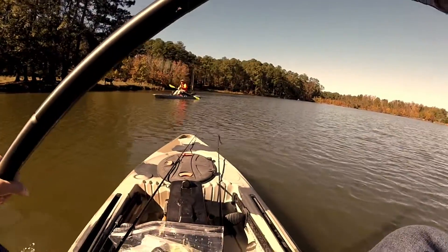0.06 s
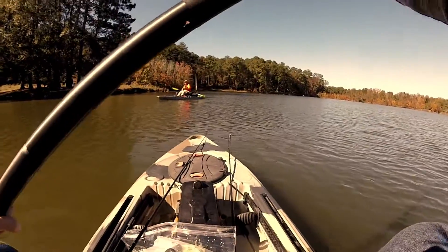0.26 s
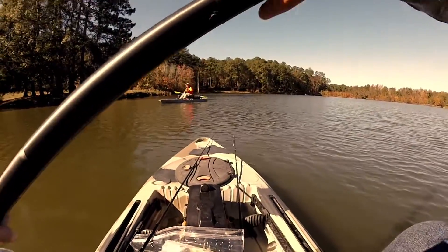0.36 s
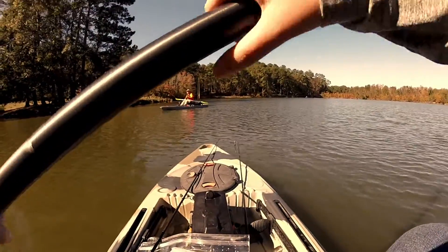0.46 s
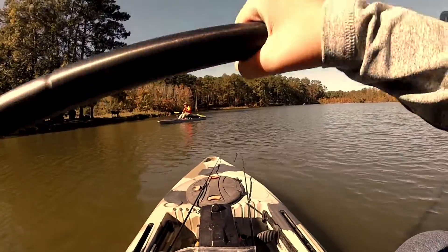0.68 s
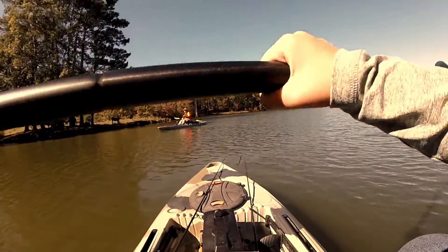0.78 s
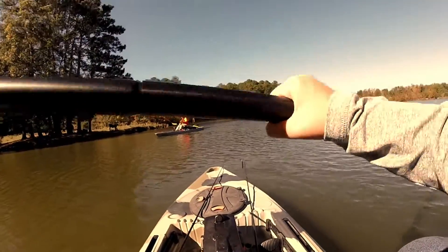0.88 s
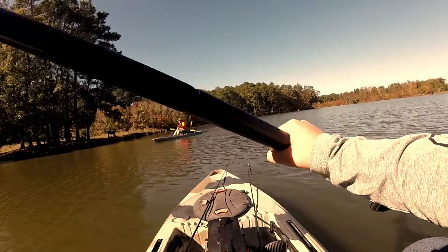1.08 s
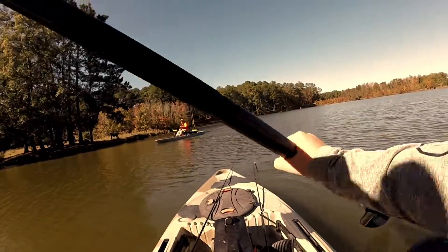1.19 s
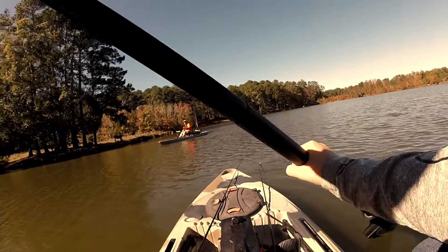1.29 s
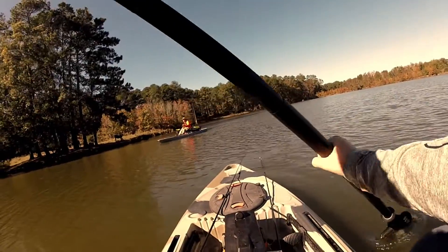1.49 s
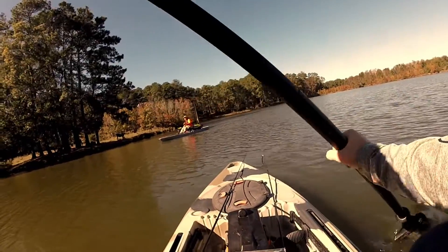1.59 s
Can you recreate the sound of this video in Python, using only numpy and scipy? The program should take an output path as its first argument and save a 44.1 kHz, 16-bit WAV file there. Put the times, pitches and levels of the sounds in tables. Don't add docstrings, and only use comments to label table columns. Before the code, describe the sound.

A kayak paddle stroke: gurgling drips, a palm sliding on the shaft, then a plopping dip

```python
import sys
import numpy as np
from scipy import signal
from scipy.fft import rfft, irfft, next_fast_len
from scipy.io import wavfile
from scipy.ndimage import uniform_filter1d, map_coordinates

SR = 44100
rng = np.random.default_rng(int(sys.argv[2]) if len(sys.argv) > 2 else 0)


def to_linear_factor(level_db):
    exponent = np.asarray(level_db, float) / 20
    return 10 ** exponent


def store_pcm(level_fs):
    pcm = np.round(np.clip(level_fs, -1, 1) * 32767).astype(np.int16)
    wavfile.write(sys.argv[1], SR, np.atleast_2d(pcm).T)


N = 72765


def unit(x):
    return x / np.sqrt(np.mean(x ** 2) + 1e-20)


def along(points, hz):
    f, v = np.transpose(points)
    return np.interp(np.log(hz + 1), np.log(f + 1), v)


def curves(rows, **ends):
    s, *columns = np.transpose(rows)
    return [np.interp(np.arange(N) / SR, s, c, **ends) for c in columns]


def wobble(rate):
    return map_coordinates(rng.standard_normal(SR // 10), [np.arange(N) * rate / SR])


def filtered(x, response):
    m = next_fast_len(N + SR // 4)
    return irfft(rfft(x, m) * response(np.fft.rfftfreq(m, 1 / SR)), m)[..., :N]


def rush(gain, patchy_db):
    z = signal.stft(rng.standard_normal(N + 512), nperseg=256)[2]
    field = uniform_filter1d(rng.standard_normal(z.shape), size=4, axis=0)
    field = uniform_filter1d(field, size=6, axis=1)
    patchy = signal.istft(z * to_linear_factor(patchy_db * unit(field)), nperseg=256)[1][:N]
    return unit(filtered(patchy, gain))


def narrow_ring(course, width_hz):
    hz, db = curves(course)
    low_noise = rush(lambda f: 1 / (1 + (2 * f / width_hz) ** 2), patchy_db=-1)
    return to_linear_factor(db) * low_noise * np.sin(2 * np.pi * np.cumsum(hz) / SR)


def bubbles(rows, rise, swell, size):
    s, db, hz, cycles = np.transpose(rows)[:, :, None]
    t = np.arange(size) / SR
    age = t * hz / np.maximum(cycles, .5)
    sine = np.sin(2 * np.pi * hz * t * (1 + rise * np.minimum(age, 2) / 2))
    fade = np.hanning(2 * size)[size:] ** .5
    shape = (1 - np.exp(-age / max(swell, .01))) * np.exp(-3 * age) * fade
    shape = shape / shape.max(1, keepdims=True)
    at = np.clip(np.round(s * SR).astype(int), 0, N) + np.arange(size)
    return np.bincount(at.ravel(), (to_linear_factor(db) * sine * shape).ravel(), N + size)[:N]


def swarm(course, spread, cycles, scatter_db, count, size):
    u, g = rng.random((count, 2)), rng.standard_normal((count, 2))
    start, end, first, last = course
    s = start + u[:, 0] * (end - start)
    db = -scatter_db * np.log(u[:, 1] + 1e-2)
    hz = np.clip(first * (last / first) ** u[:, 0] * np.exp(spread * g[:, 0]), 150, 14000)
    rows = np.c_[s, db, hz, cycles * np.exp(.3 * g[:, 1])]
    return unit(bubbles(rows, rise=0.29, swell=0.19, size=size)) * np.sqrt(abs(end - start) * SR / N)


def gurgle():
    draining = (.04, 0.72, 712, 651)
    return to_linear_factor(-7) * swarm(draining, 0.583, 8.5, 1.1, count=700, size=1500)


def wash():
    # f/Hz, density/dB per Hz
    wash_colour = [(60, -63), (150, -4.5), (468, -2.5), (640, -8.5), (1670, -10), (2400, -17.5),
                   (9270, -37.5), (15000, -62)]
    return to_linear_factor(-3.5 + 0.62 * wobble(30.1)) * rush(lambda f: to_linear_factor(along(wash_colour, f)), patchy_db=2)


def fizz():
    fizzing = (0, 1.65, 3300, 3000)
    shed_db, shed_s = 3, 0.18
    level_db = -22 + shed_db * np.exp(-(np.arange(N) / SR / shed_s) ** 2)
    return to_linear_factor(level_db) * swarm(fizzing, 0.336, 6.5, 6.0, count=3000, size=300)


def stream():
    dragged_air = (.8, 1.33, 1000, 1450)
    return to_linear_factor(-5.5) * swarm(dragged_air, 0.238, 8.7, 1.8, count=320, size=1200)


def stirred_water():
    # t/s, level/dB
    stir = [(0, -44.5), (.2, -45), (.3, -42), (.42, -39.5), (.55, -39.5), (.65, -43), (.78, -44.5),
            (.82, -41.5), (.87, -39.5), (.95, -44.5), (1.1, -48), (1.3, -48), (1.4, -49), (1.65, -51.5)]
    stir_db, = curves(stir)
    return to_linear_factor(stir_db) * (gurgle() + wash() + fizz() + stream())


def housing_air():
    corner_hz = 5960
    return to_linear_factor(-66) * rush(lambda f: (f > 2000) / (1 + (f / corner_hz) ** 2), patchy_db=1)


def hull():
    # t/s, level/dB
    shudder_level = [(0, -43.5), (.15, -47), (.22, -41.5), (.4, -40.5), (.52, -44), (.62, -38.5),
                     (.72, -49.5), (.82, -44), (.89, -29.5), (.97, -30), (1.08, -40.5), (1.25, -31.5),
                     (1.4, -42.5), (1.65, -51)]
    # f/Hz, density/dB per Hz
    shell_colour = [(12, -16), (22, -6), (50, -1), (80, -3), (182, -14.5), (300, -33), (420, -57),
                    (880, -120)]
    # t/s, peak level/dB, f/Hz, life/cycles
    surges = [(.241, -32, 80, 1.3), (.279, -28, 83.6, 1.5), (.42, -25, 70.6, 2.14), (.602, -28, 86, 1.7),
              (.857, -28, 70.5, 1.4), (.89, -23.5, 65, 1.1), (.919, -20.5, 64, 0.92), (.935, -20, 80, 5.2),
              (1.006, -29.5, 91, 2.1), (1.032, -19.5, 110, 2.17), (1.097, -19.5, 69.6, 1.84),
              (1.122, -33, 63, 3), (1.172, -15, 84, 2.2), (1.199, -31.5, 71, 0.66), (1.224, -22, 74, 1.3),
              (1.239, -19, 74.6, 2.1), (1.288, -23.5, 61.6, 2), (1.361, -28.5, 93, 3),
              (1.508, -32, 81, 1.8), (1.607, -30, 60, 1.25)]
    level_db, = curves(shudder_level)
    lumps = to_linear_factor(1.5 * wobble(25))
    shudder = unit(lumps * rush(lambda f: to_linear_factor(along(shell_colour, f)), patchy_db=1))
    overtones = np.multiply(surges, [1, 1.16, 2.21, 1.28])
    booms = bubbles(surges, 0.12, 0.15, size=4000) + to_linear_factor(-7.5) * bubbles(overtones, 0, 0.15, size=4000)
    muffle_hz = 268
    return to_linear_factor(level_db + 1.5) * shudder + filtered(booms, lambda f: 1 / (1 + (f / muffle_hz) ** 4))


def with_life(rows, cycles):
    return [(*r, cycles) for r in rows]


def plops_and_glugs():
    # t/s, peak level/dB, f/Hz
    babble = [(.003, -46, 990), (.076, -39.5, 1600), (.113, -39, 766), (.201, -41, 990), (.221, -44, 818),
              (.242, -37, 1700), (.281, -37, 1040), (.314, -37, 800), (.372, -40, 683), (.473, -46, 1030),
              (.496, -35, 1900), (.533, -36, 800), (.585, -38, 604), (.612, -35, 900), (.626, -41, 1530),
              (.661, -35.5, 904), (.692, -58, 1950), (.72, -40, 492)]
    # t/s, peak level/dB, f/Hz, life/cycles
    dip_plops = [(0.031, -43, 1162, 23), (0.049, -38.5, 885, 16), (0.27, -29, 1140, 7.8),
                 (0.338, -33.5, 1180, 13), (0.35, -28, 950, 2.8), (0.394, -27.5, 1520, 4.8),
                 (0.513, -31.5, 1320, 9.3), (.812, -35, 840, 4.8), (0.828, -49, 1060, 7),
                 (.835, -36, 1080, 11), (0.848, -20.5, 1136, 5.7), (.88, -30, 1030, 5.4),
                 (.921, -36, 1010, 8.8), (1.008, -34.5, 1280, 7.2), (1.027, -47, 1250, 4),
                 (0.867, -21, 1080, 4.4), (0.873, -23, 960, 5.4), (0.896, -28, 1080, 6.2),
                 (0.904, -21, 950, 6.5), (0.999, -26.5, 1123, 11.6), (1.079, -25, 1144, 16.5),
                 (1.082, -24, 1144, 8.6)]
    # t/s, peak level/dB, f/Hz, life/cycles
    glugs = [(.245, -38, 232, 8), (.258, -29, 294, 6.7), (.311, -29.5, 411, 6.8), (.425, -33.5, 181, 5.5),
             (.503, -35.5, 327, 6.4), (.51, -41, 199.5, 15), (.56, -38, 380, 6.7), (.627, -39.5, 427, 11),
             (.599, -31.5, 464, 4.2), (.733, -30.5, 400, 2.5), (.806, -40, 330, 8.6), (.856, -27, 376, 3.5),
             (.876, -31, 327, 5.3), (.925, -29, 198, 3.5), (1.21, -31, 141, 12), (1.36, -40.5, 333, 9),
             (1.591, -44, 603, 8.2)]
    # t/s, peak level/dB, f/Hz
    trickle = [(1.064, -28.5, 1250), (1.093, -33.5, 1500), (1.1, -37, 1120), (1.1108, -32.5, 1320),
               (1.1213, -32, 1530), (1.1452, -37, 1170), (1.1811, -36, 1736), (1.192, -38, 1430),
               (1.2061, -36.5, 1560), (1.216, -36.5, 2000), (1.2415, -35, 1400), (1.2594, -35, 1660),
               (1.2659, -36, 1500), (1.2899, -41.5, 1090), (1.3009, -36, 1500), (1.3138, -36.5, 1800),
               (1.3403, -47, 950), (1.3622, -49, 1450), (1.466, -44, 1430), (1.5898, -39.5, 1120)]
    plops = np.array(dip_plops + with_life(trickle, 8) + with_life(babble, 13.3))
    single = bubbles(glugs, 0.098, 0.15, size=3000) + to_linear_factor(-2.0) * bubbles(plops, 0.036, 0.14, size=1600)
    when, hz, cycles = plops[:, :2], plops[:, 2], plops[:, 3]
    smack = bubbles(np.c_[when, 1.7 * hz, .4 * cycles], 0.036, 0.044, size=300)
    upper_smack = bubbles(np.c_[when, 2.5 * hz, .6 * cycles], 0, 0.11, size=300)
    return single + to_linear_factor(-9.5) * (smack + to_linear_factor(-9.5) * upper_smack)


def singers():
    # t/s, peak level/dB, f/Hz, life/cycles, pitch gain/0-1
    singing = [
        (0.082, -42, 414, 25, 0.01),
        (0.29, -33.5, 382, 11.9, 0.25),
        (0.4, -36, 960, 33, 0.2),
        (.647, -37, 1030, 24, 0.05),
        (0.11, -41.5, 365, 12, 0.02),
        (0.14, -40, 386, 9.5, 0),
        (1.27, -49, 1050, 47, 0.07),
        (0.959, -36, 1140, 22, 0.14),
        (1.034, -35.5, 1275, 34, 0.08),
        (1.126, -40, 1570, 19, 0),
    ]
    rows = np.array(singing)
    return to_linear_factor(2.7 * wobble(120)) * bubbles(rows[:, :4], rows[:, 4:], 0.21, size=6000)


def spray():
    # t/s, peak level/dB
    ticks = [
        (.197, -60),
        (.291, -61),
        (.354, -58),
        (.646, -49),
        (1.371, -60),
        (1.563, -63),
        (1.627, -62),
        (1.633, -60),
    ]
    t, out = np.arange(200) / SR, np.zeros(N + 200)
    for s, db in ticks:
        burst = to_linear_factor(db - 60 * t / 0.012) * rng.standard_normal(len(t))
        out[round(s * SR):][:len(t)] += burst
    return filtered(out[:N], lambda f: 1 / (1 + (4500 / (f + 1)) ** 4))


def drops():
    # t/s, peak level/dB, f/Hz
    falling = [(0.3346, -42, 3320), (0.7427, -39, 2350), (0.8874, -38, 1860), (1.474, -48.5, 5260),
               (1.5579, -44, 2580), (1.6077, -48, 4340), (0.3421, -43.5, 6200), (1.5449, -51, 6800),
               (.2204, -66, 7900), (.227, -58, 11200), (.334, -52, 11300), (1.339, -54.5, 9300),
               (1.544, -53, 12000), (.3147, -59, 6050), (.691, -43, 2450), (.868, -53, 3315),
               (.943, -48, 1840), (1.066, -47, 3020), (1.098, -45, 2220), (1.146, -47, 2300),
               (1.2161, -49.5, 5130)]
    return to_linear_factor(-1.5) * bubbles(with_life(falling, 26.4), 0.017, 0.091, size=500)


def first_slide():
    # t/s, level/dB
    rub = [
        (.39, -73),
        (.42, -52),
        (.445, -45.5),
        (.632, -48),
        (.652, -63),
        (.675, -74),
    ]
    # f/Hz, density/dB per Hz
    skin = [(1470, -34), (2500, -13), (3750, -1.5), (4080, -1), (9250, -8.5), (11200, -13), (15100, -12.5)]
    # f/Hz, width/Hz, level over skin/dB
    shaft = [(4100, 190, 4.5), (12000, 560, 8)]
    # t/s, f/Hz, level/dB
    grip = [
        (.42, 7680, -3),
        (.5, 7000, -13),
        (.56, 6270, -8),
        (.62, 6720, 0.5),
    ]
    # t/s, f/Hz, level/dB
    tube = [
        (.42, 11500, -13),
        (.49, 11300, -13),
        (.57, 11200, -2),
        (.64, 11350, -4.5),
    ]

    def skin_on_shaft(f):
        boost = sum(to_linear_factor(2 * db) / (1 + (2 * (f - hz) / width) ** 2) for hz, width, db in shaft)
        return to_linear_factor(along(skin, f)) * np.sqrt(1 + boost)

    rub_db, = curves(rub, left=-120, right=-120)
    friction = rush(skin_on_shaft, patchy_db=0.2)
    friction = friction + narrow_ring(grip, width_hz=600) + narrow_ring(tube, width_hz=300)
    return to_linear_factor(rub_db + 0.49 * wobble(62.5)) * friction


def second_slide():
    # t/s, level/dB, brightness/0-1
    loose_rub = [
        (.672, -73, .1),
        (.69, -58, 0.36),
        (.76, -51.5, 0),
        (.84, -56.5, 0.1),
        (.9, -53.5, 0.76),
        (1.025, -57.5, 0.64),
        (1.05, -72, 1),
    ]
    # f/Hz, density/dB per Hz
    loose_dull = [(1760, -36), (3000, -6), (5010, -3), (7400, -10), (10000, -3), (12500, -6),
                  (15100, -10.5)]
    # f/Hz, density/dB per Hz
    loose_bright = [(1760, -34), (3000, -18), (6890, 0.5), (8670, -12), (12800, -2), (15100, -9)]
    rub_db, bright = curves(loose_rub, left=-120, right=-120)
    bright = np.clip(bright, 0, 1)
    dull_noise = rush(lambda f: to_linear_factor(along(loose_dull, f)), patchy_db=1.3)
    bright_noise = rush(lambda f: to_linear_factor(along(loose_bright, f)), patchy_db=1.3)
    return to_linear_factor(rub_db - 0.9) * (np.sqrt(1 - bright) * dull_noise + np.sqrt(bright) * bright_noise)


def scene():
    water = stirred_water() + plops_and_glugs() + singers() + spray() + drops()
    palm = first_slide() + second_slide()
    return (water + housing_air() + hull() + palm)[None]


def band_limit(x):
    return signal.sosfilt(signal.butter(12, 15240, fs=SR, output="sos"), x)


def record(dry):
    low_hz, top_hz = 10, 15280
    mix = filtered(dry, lambda f: (f > low_hz) & (f < top_hz))
    return band_limit(mix)


dry = scene()
out = record(dry)
store_pcm(out)
```